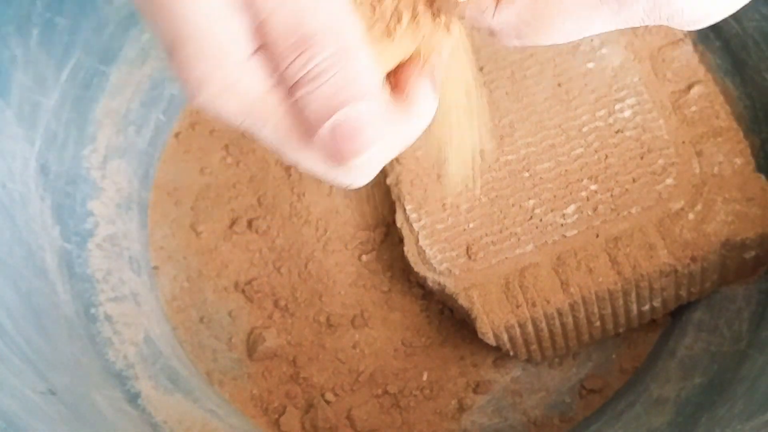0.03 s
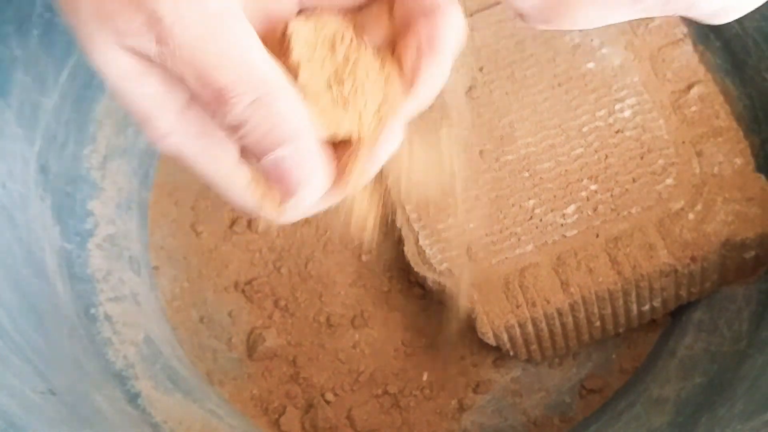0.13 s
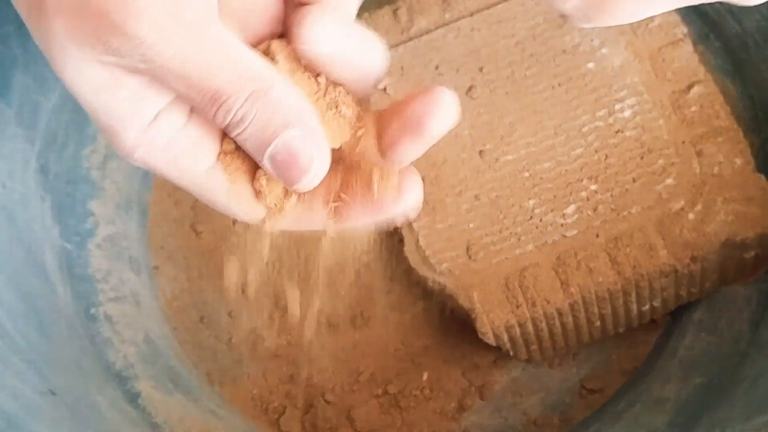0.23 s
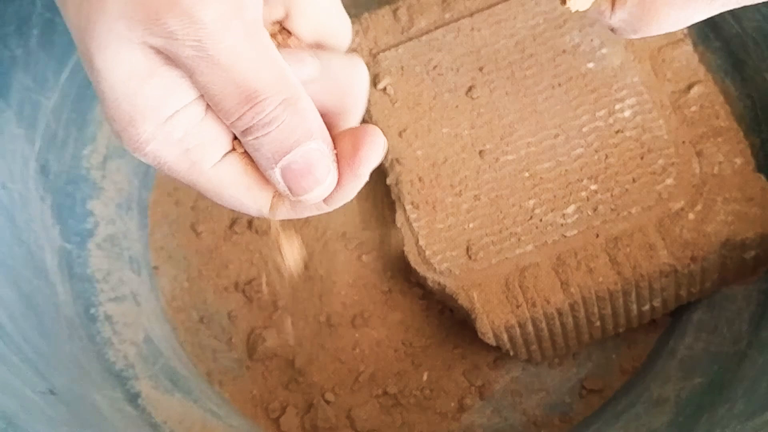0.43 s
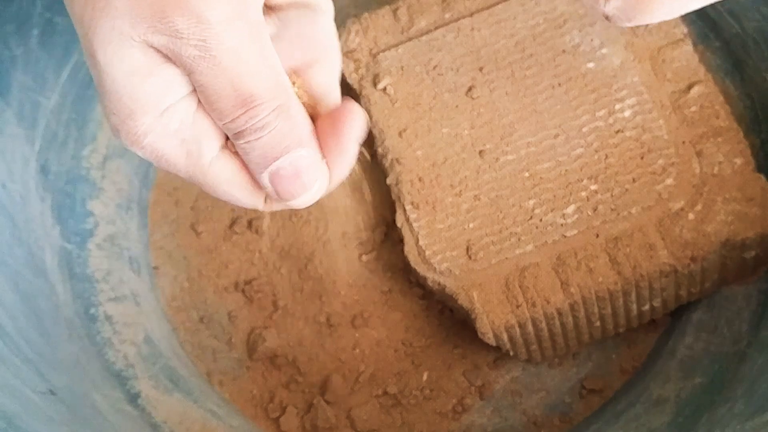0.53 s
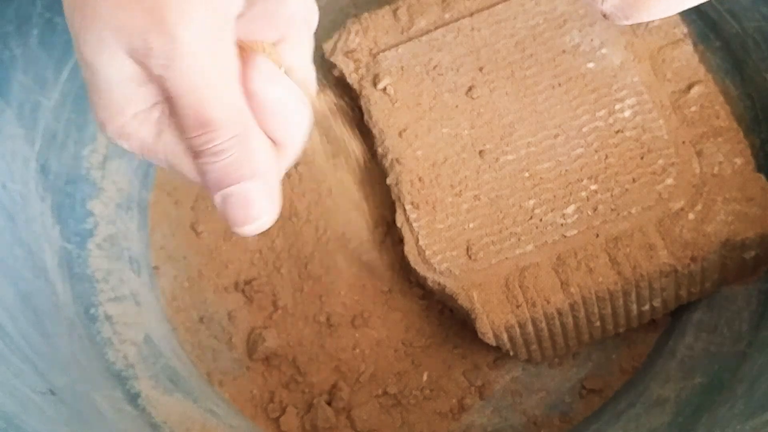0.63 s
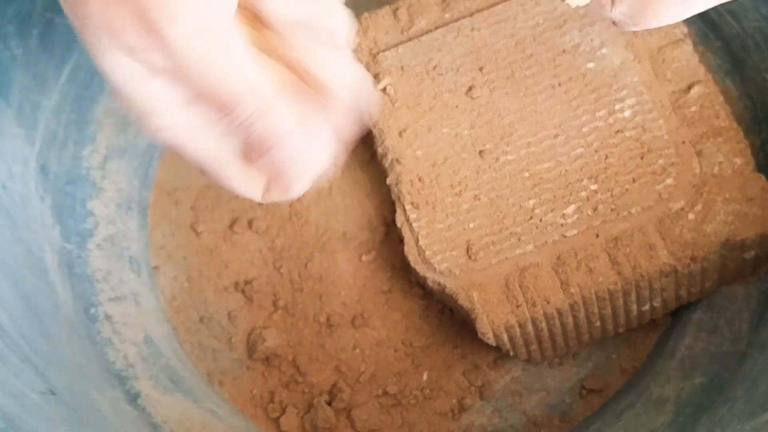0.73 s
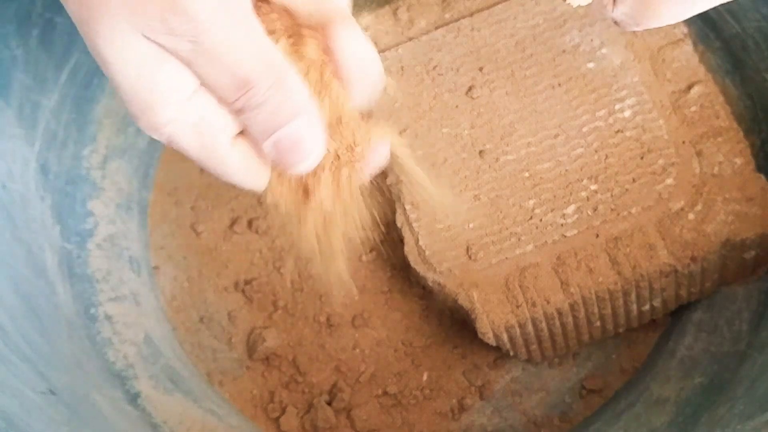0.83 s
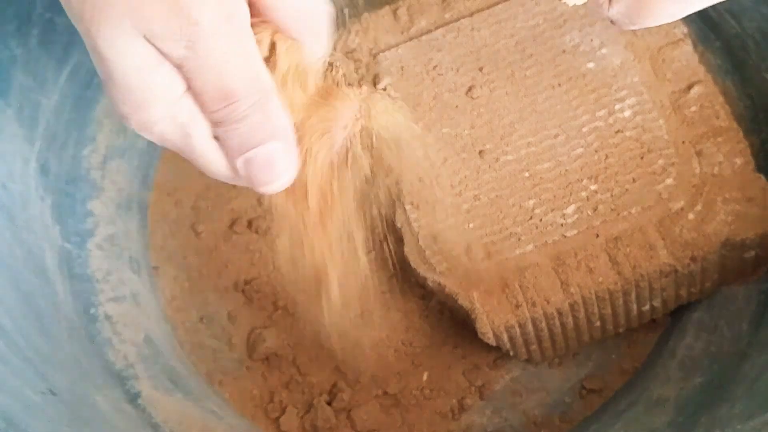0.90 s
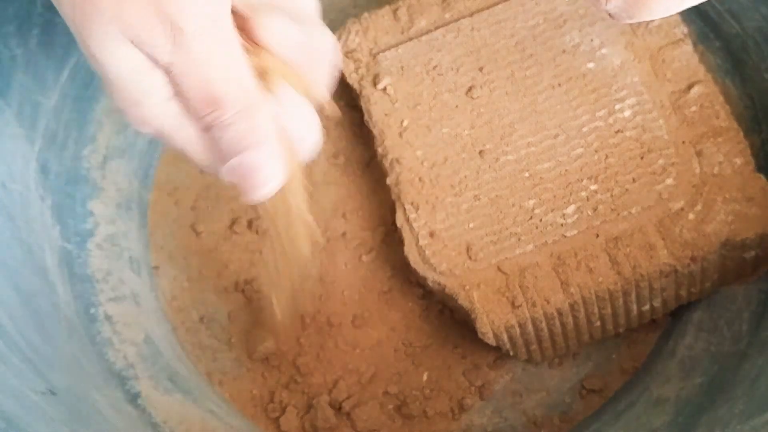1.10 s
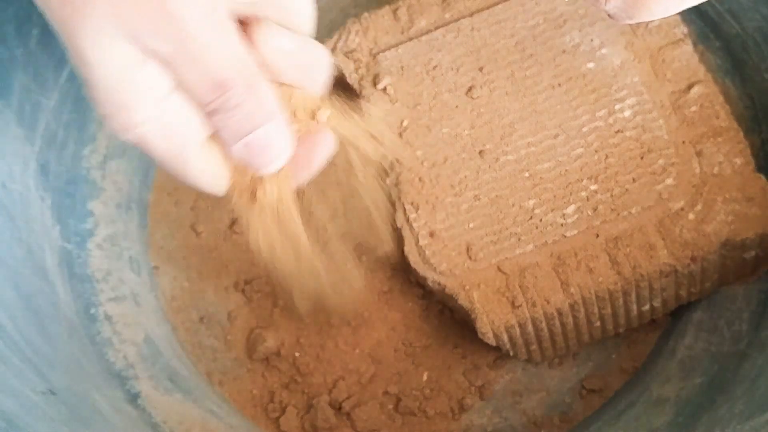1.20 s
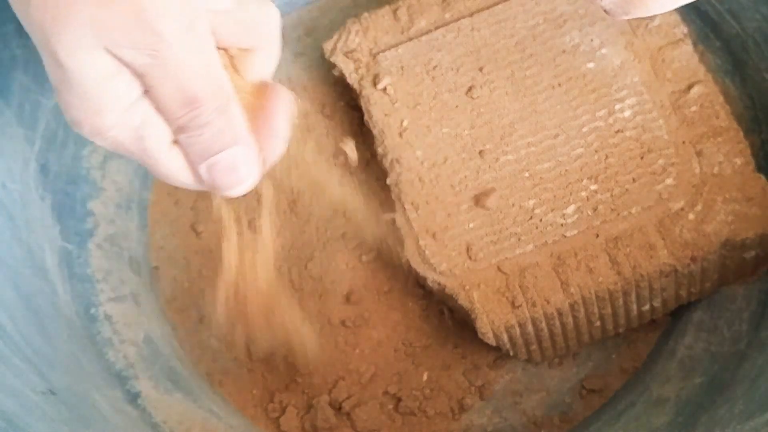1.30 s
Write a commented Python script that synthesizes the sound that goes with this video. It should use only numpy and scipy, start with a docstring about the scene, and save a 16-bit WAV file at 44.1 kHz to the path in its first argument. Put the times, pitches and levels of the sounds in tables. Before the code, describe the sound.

A lump of dry sand crumbles in a hand with a few crisp, close crunches. Loose grains hiss into a plastic basin, then a softer squeeze sheds more with faint crackles, over a quiet room's low rumble.

```python
"""Crumbling dry sand over a basin

A hand crushes a lump of dry sand over a plastic basin, close by in a quiet room with a low rumble.
The lump fails by brittle fracture: each sharp crack is an impulse and a decaying spray of smaller ones,
exciting resonances of the hand and the basin. Clumps thud softly, and the many impacts of loose grains
merge into a hiss. A second, softer squeeze sheds more."""
import sys
import numpy as np
from scipy import signal
from scipy.fft import rfft, irfft
from scipy.io import wavfile

SR = 44100
rng = np.random.default_rng(int(sys.argv[2]) if len(sys.argv) > 2 else 0)


def master(y):
    """Save y as 16-bit WAV."""
    cut = np.clip(np.atleast_2d(y).T, -1, 1)
    pcm = np.round(cut * 32767)  # scale
    wavfile.write(sys.argv[1], SR, pcm.astype(np.int16))


N = 59535
T = np.arange(N) / SR
HZ = np.maximum(np.fft.rfftfreq(N, 1 / SR), 1)


def from_db(db):
    """Amplitude ratio of a level in decibels."""
    return 10 ** (np.asarray(db) / 20)


def unit_rms(x):
    """Normalisation to unit mean power."""
    return x / np.sqrt(np.mean(x ** 2) + 1e-20)


def unit_energy(x):
    """Normalisation of each channel to unit energy."""
    return x / np.sqrt(np.sum(x ** 2, axis=-1, keepdims=True) + 1e-20)


def over_time(points):
    """Linear interpolation of a table at every sample."""
    return np.interp(T, *np.transpose(points))


def over_hz(points):
    """Interpolation of a table on a logarithmic frequency axis."""
    hz, value = np.transpose(points)
    return np.interp(np.log(HZ), np.log(hz), value)


def colour(x, spectrum):
    """Spectral shaping by a table of gains, at unit rms."""
    return unit_rms(irfft(rfft(x) * from_db(over_hz(spectrum)), N))


def butterworth(x, hz, kind, order):
    """Maximally flat high-pass or low-pass filtering."""
    return signal.sosfilt(signal.butter(order, hz, kind, fs=SR, output="sos"), x)


def resonate(x, hz, width_hz):
    """Forced response of one damped mode."""
    r = np.exp(-np.pi * width_hz / SR)
    return signal.lfilter([1, 0, -1], [1, -2 * r * np.cos(2 * np.pi * hz / SR), r * r], x + 1e-18)


def drift(corner_hz):
    """Slow random fluctuation: low-passed noise of unit rms."""
    return unit_rms(irfft(rfft(rng.standard_normal(N)) / (1 + (HZ / corner_hz) ** 2), N))


def pan(db):
    """Interchannel level difference: two gains, left over right by db."""
    return from_db(np.array([[.5], [-.5]]) * db)


def direct_path(x, lag_s=.000136):
    """Path difference: direct sound arrives slightly later on the right."""
    return np.array([x, np.roll(x, round(lag_s * SR))])


def impulses(per_s, spread_db, size):
    """A Poisson process of clicks, many small and a few large."""
    occurs = rng.random(size) < per_s / SR
    strength = from_db(spread_db * np.minimum(rng.exponential(1, size), 5))
    return occurs * strength * rng.choice([-1, 1], size)


# Spectrum of the rumble: (frequency [Hz], relative spectral level [dB])
RUMBLE_SPECTRUM = [(15, -10), (35, -13), (60, 1), (85, -5), (125, -1), (150, -4), (185, -3), (240, -15.5),
                   (430, -14), (560, -25), (1000, -28.5), (2500, -33.5), (6000, -49.5), (16000, -31.5)]
# Likeness of left and right: (frequency [Hz], correlation [1])
RUMBLE_CORRELATION = [(30, 0.91), (150, 0.99), (300, 0.86), (700, 0.27), (2000, 0), (16000, 0)]
# Envelope of the rumble: (time [s], level [dB])
RUMBLE_ENVELOPE = [(0, -52), (.27, -51), (.52, -50.5), (.78, -53.5), (.92, -50.5), (1.1, -51.5),
                   (1.35, -51.5)]
def room_rumble(hum_hz=124.55, hum_db=-7.5):
    """Background noise, coherent between channels at long wavelengths, with a wavering hum."""
    correlation = over_hz(RUMBLE_CORRELATION)
    mid, side = rfft(rng.standard_normal((2, N)))
    noise = irfft(np.sqrt(1 + correlation) * mid + np.sqrt(1 - correlation) * side * [[1], [-1]], N)
    swell = 1 + .5 * drift(9)
    hum = unit_rms(swell * np.sin(2 * np.pi * hum_hz * T + 1.14 * drift(1.16)))
    rumble = colour(noise, RUMBLE_SPECTRUM) + from_db(hum_db) * hum
    return pan(-1.5) * from_db(over_time(RUMBLE_ENVELOPE)) * rumble


def impacts(per_s, spread_db, fade_s, spots=12, direct_share=.38):
    """Superposition: each landing spot is heard directly and by its own scatter off the basin wall."""
    t, out = T[:1024], 0
    for _ in range(spots):
        clicks = impulses(per_s / spots, spread_db, N)
        response = unit_energy(rng.standard_normal((2, len(t))) * np.exp(-t / fade_s))
        scatter = signal.fftconvolve(clicks[None], response)[:, :N]
        out = out + np.sqrt(direct_share) * direct_path(clicks) + np.sqrt(1 - direct_share) * scatter
    return out


# Envelope of the falling stream: (time [s], level [dB])
SAND_FLOW = [(0, -67), (.12, -69), (.16, -60.5), (.19, -58.5), (.265, -62.5), (.288, -46.5), (.32, -52),
             (.345, -47), (.365, -41.5), (.40, -44), (.436, -48), (.475, -45), (.53, -50.5), (.566, -49.5),
             (.66, -54.5), (.71, -63.5), (.81, -66), (.855, -53.5), (.92, -56), (.955, -46), (1.02, -54.5),
             (1.09, -56), (1.135, -60.5), (1.195, -64.5), (1.25, -53), (1.282, -59), (1.315, -53),
             (1.35, -49.5)]
# Impact spectrum of fine grains: (frequency [Hz], relative spectral level [dB])
GRAIN_SPECTRUM = [(250, -17), (550, -17), (750, -3), (1000, -6), (1350, -1), (2000, -14), (3000, -4.5),
                  (4500, -5.5), (7000, -2), (9200, 0.5), (12500, -3), (14800, -11.5), (16000, -10.5)]
# Impact spectrum of coarse crumbs: (frequency [Hz], relative spectral level [dB])
CRUMB_SPECTRUM = [(200, -17), (400, -20), (550, -28), (760, -5), (1400, 11.5), (3000, -1.5), (6000, -8.5),
                  (16000, -15)]
# Direction of the fine grains: (time [s], left minus right level [dB])
GRAIN_PAN = [(0, 2), (.27, -5.5), (.37, -1), (.47, 0), (.54, 1), (1.35, 0.5)]
def falling_sand(clumping_db=.5, crumb_db=-11.5):
    """Shot noise: dense impacts of fine grains merge into a hiss, with sparser crumbs among them."""
    flow = from_db(over_time(SAND_FLOW) + clumping_db * drift(35))
    grains = colour(impacts(per_s=12000, spread_db=3, fade_s=.0028), GRAIN_SPECTRUM)
    crumbs = colour(impacts(per_s=220, spread_db=2, fade_s=.01), CRUMB_SPECTRUM)
    return flow * (pan(over_time(GRAIN_PAN)) * grains + from_db(crumb_db) * crumbs)


def fracture_spray(decay_s, size, attack_s=.00033):
    """A cascade of microfractures with exponential decay, part direct and part scattered."""
    t = T[:size]
    direct, *scattered = impulses(per_s=9000, spread_db=3, size=(3, size))
    spray = .45 * direct_path(direct) + np.array(scattered)
    return unit_energy(spray * (1 - np.exp(-t / attack_s)) * np.exp(-t / decay_s))


FIRST_SHARE = .23   # share of the force's energy in the first fracture
HAND_T60_S = .032
BASIN_HZ, BASIN_WIDTH_HZ, BASIN_DB = 1403, 180, -4   # level relative to the crunch
def crack(knock_db, crunch_db, snap_db, knock_hz, crunch_hz, snap_hz, decay_s, snap_pan_db, size=4096):
    """Impulse excitation: a fracture gives a knock in the hollow of the hand, a crunch and a snap."""
    first = direct_path(signal.unit_impulse(size))
    spray = fracture_spray(decay_s, size)
    force = np.sqrt(FIRST_SHARE) * first + np.sqrt(1 - FIRST_SHARE) * spray
    cavity = resonate(first + .15 * spray, knock_hz, width_hz=np.log(1000) / np.pi / HAND_T60_S)
    knock = unit_energy(butterworth(cavity, 640, "high", order=3))
    crunch = resonate(force, crunch_hz, width_hz=1480)
    crunch = butterworth(crunch, 1055, "high", order=4)
    crunch = unit_energy(butterworth(crunch, 4590, "low", order=4))
    basin = from_db(BASIN_DB) * unit_energy(resonate(force, BASIN_HZ, BASIN_WIDTH_HZ))
    snap = butterworth(force, snap_hz, "high", order=3)
    snap = unit_energy(butterworth(snap, min(2.06 * snap_hz, 13200), "low", order=3))
    body = from_db(knock_db) * knock + from_db(crunch_db) * (crunch + basin)
    return pan(1.1) * body + pan(snap_pan_db) * from_db(snap_db) * snap


# Fractures of the lump: (time [s], relative knock level [dB], relative crunch level [dB],
# relative snap level [dB], knock frequency [Hz], crunch centre [Hz], snap lower edge [Hz],
# spray time constant [s], snap left minus right level [dB])
FRACTURES = [(.1285, -55, -55, -45.5, 795, 2900, 6300, 0.0014, 5),
             (.1512, -52, -41.5, -40.5, 796, 2370, 5850, 0.0049, 6),
             (.1755, -57, -40, -67, 805, 2600, 5000, 0.0022, -1),
             (.1998, -70, -20.5, -38.5, 740, 3230, 8600, 0.0027, 25),
             (.2018, -22.5, -18, -22.5, 751, 2620, 9000, 0.0016, 3),
             (.2477, -37.5, -28, -37.5, 735, 1580, 7940, 0.0033, 4),
             (0.279, -64, -43, -41, 810, 2500, 7700, 0.0012, 12),
             (.2952, -44.5, -58, -33.5, 800, 2500, 7000, 0.00087, 2),
             (.2983, -32.5, -22, -32.5, 822, 1410, 7100, 0.0037, 11),
             (.3062, -35, -57, -30, 910, 2500, 7060, 0.0034, 1),
             (.3512, -43, -24.5, -20.5, 820, 2660, 4960, 0.0012, 0),
             (.3528, -30, -15.5, -13.5, 716, 1500, 6900, 0.0027, 2),
             (.3538, -35.5, -22.5, -13.5, 870, 3020, 4420, 0.0053, -5),
             (.3728, -40, -53, -35.5, 910, 2000, 5000, 0.0012, -7),
             (.5595, -44.5, -49, -41, 748, 1400, 6000, 0.0035, -8),
             (.8255, -73, -55, -45.5, 790, 2480, 5000, 0.0012, -1),
             (.9322, -40.5, -39, -41, 740, 2430, 6000, 0.0017, 11),
             (1.0005, -37.5, -51.5, -40, 776, 1100, 6030, 0.0023, 3),
             (1.051, -49, -46.5, -64, 790, 3000, 4500, 0.0026, -2),
             (1.0617, -65, -51, -61, 790, 3000, 4500, 0.0022, 1),
             (1.1070, -55, -46, -57, 810, 2180, 4500, 0.0041, -4),
             (1.1585, -54, -52, -45.5, 775, 2500, 6700, 0.0023, 14.5),
             (1.2035, -48, -44, -36.5, 810, 3250, 7560, 0.0036, 7.5),
             (1.2322, -70, -52, -40.5, 805, 2500, 7160, 0.00077, 8),
             (1.2400, -66, -35, -54, 790, 1960, 6000, 0.00071, 5)]
def breaking_lump(gain_db=12.5):
    """Brittle fracture: the lump gives way in a series of discrete cracks."""
    out = np.zeros((2, N + SR))
    for onset_s, *settings in FRACTURES:
        sound, start = crack(*settings), int(onset_s * SR)
        out[:, start:start + sound.shape[1]] += sound
    return from_db(gain_db) * out[:, :N]


# Blows of clumps in the hand and on the heap: (time [s], level before the attack ramp [dB], pitch [Hz])
CLUMP_BLOWS = [(0.2, -37.5, 282), (0.3544, -38.5, 440), (.5580, -36.5, 354)]
def clump_thuds(t60_s=.025, attack_s=.0025):
    """Damped free vibration: each soft blow excites one low, short-lived tone."""
    out = 0
    for onset_s, db, hz in CLUMP_BLOWS:
        t = np.maximum(T - onset_s, 0)
        envelope = from_db(db - 60 * t / t60_s) * (1 - np.exp(-t / attack_s))
        out = out + envelope * np.sin(2 * np.pi * hz * t)
    return direct_path(out)


def reverberation(x, t60_s=.2, gain_db=-12):
    """Diffuse reflections of a small room: convolution with dull, exponentially decaying noise."""
    envelope = from_db(-60 * T / t60_s) * (1 - np.exp(-T / .0013))
    tail = unit_energy(rng.standard_normal((2, N)) * envelope)
    response = butterworth(tail, 5900, "low", order=1)
    return from_db(gain_db) * signal.fftconvolve(x, response, axes=1)[:, :N]


def scene():
    """Superposition of cracks and thuds, their reverberation, the falling sand and the rumble."""
    blows = breaking_lump() + clump_thuds()
    return blows + reverberation(blows) + falling_sand() + room_rumble()


def record(dry):
    """Band limiting: a steep elliptic low-pass removes the treble above 15.8 kHz."""
    return signal.sosfilt(signal.ellip(10, .1, 80, 15800, fs=SR, output="sos"), dry)


dry = scene()
out = record(dry)
master(out)
```